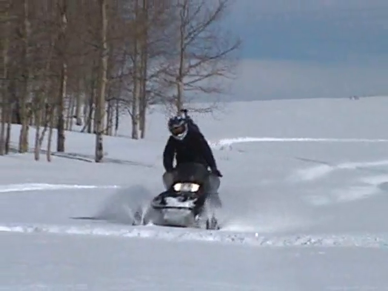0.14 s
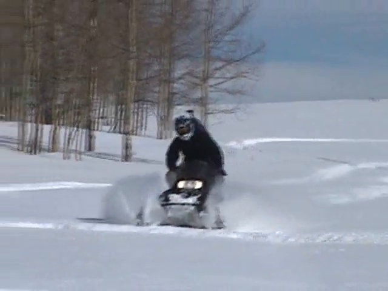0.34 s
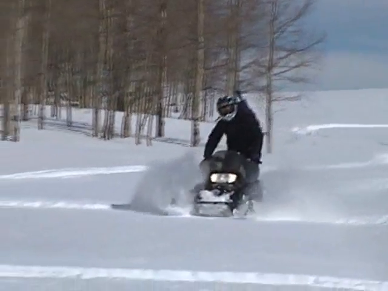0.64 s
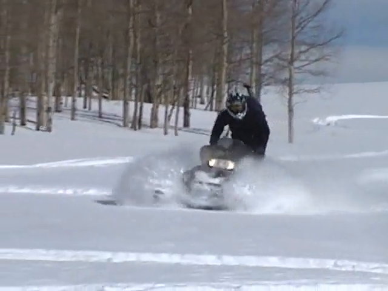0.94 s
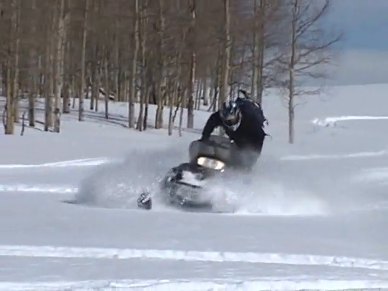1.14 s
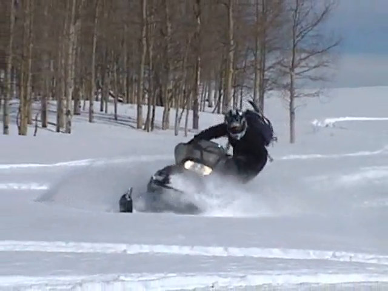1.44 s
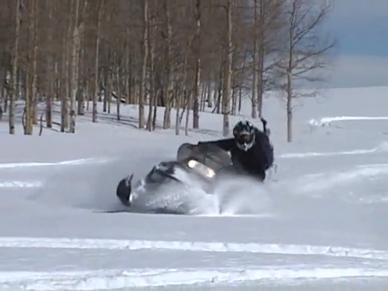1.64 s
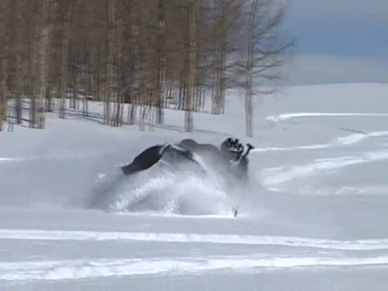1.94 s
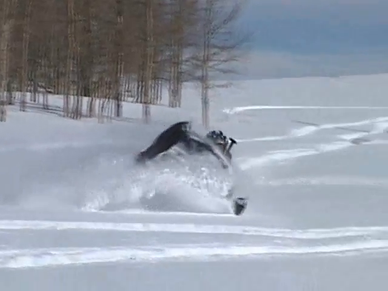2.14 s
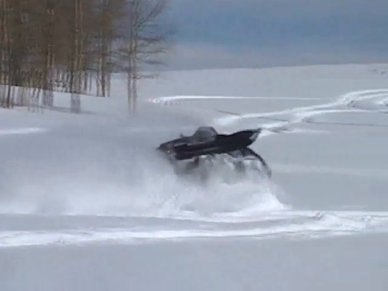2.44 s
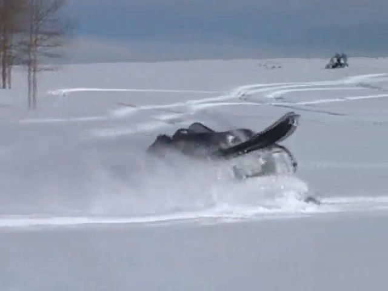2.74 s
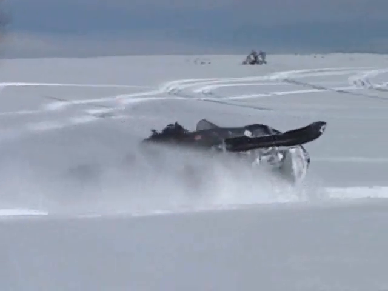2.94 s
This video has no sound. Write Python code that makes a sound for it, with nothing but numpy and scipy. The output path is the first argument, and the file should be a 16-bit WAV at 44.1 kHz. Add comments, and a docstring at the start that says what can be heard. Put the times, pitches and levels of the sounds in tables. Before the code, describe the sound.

A snowmobile approaches outdoors, its engine muffled and sagging under a light hiss of thrown snow. It revs up sharply and bursts into a loud, raspy buzz near the microphone, staying high as its tone turns duller.

```python
"""A two-stroke snowmobile labours through deep snow, then revs up and carves past on its side.
At first the exhaust is buried: one hears a muffled drone, clatter under the hood, a whining drive
and hissing powder. From about 1.3 s the revs climb, the buried pipe barks and the track howls briefly.
Near 1.8 s the sled tips, so the pipe clears the snow and rasps at the listener, one pulse per firing.
Then the pipe turns away, which changes its tone while the engine keeps running fast."""
import sys
import numpy as np
from scipy import signal
from scipy.fft import rfft, irfft
from scipy.io import wavfile

SR = 44100
rng = np.random.default_rng(int(sys.argv[2]) if len(sys.argv) > 2 else 0)


def unload_wav(signal):
    """Save mono or channel-first audio to the path in sys.argv[1] as 16-bit WAV at rate SR, clipped to [-1, 1]."""
    wavfile.write(
        sys.argv[1],
        SR,
        np.round(np.clip(np.atleast_2d(signal).T, -1, 1) * 32767).astype(np.int16),
    )


N = 136710
T, HZ = np.arange(N) / SR, np.fft.rfftfreq(N, 1 / SR)

# how fast the engine fires (time [s], rate [Hz])
FIRING_RATE = [(0, 200), (.1, 171), (.2, 166), (.33, 150), (.75, 153), (.89, 159), (1.1, 152), (1.28, 159),
               (1.4, 178.3), (1.6, 222), (1.75, 252), (1.82, 253), (1.9, 258), (2, 258), (2.1, 256.2),
               (2.57, 256), (2.77, 252.7), (2.85, 248.7), (3.1, 243.4)]
# how loud the open pipe is (time [s], level [dB])
EXHAUST_LEVEL = [(0, -62), (1.3, -50), (1.5, -35), (1.68, -30.5), (1.73, -28.5), (1.79, -23), (1.83, -13),
                 (1.9, -13.5), (1.98, -14), (2.12, -13), (2.3, -12.5), (2.55, -12), (2.8, -12), (2.88, -14),
                 (3.1, -14)]
# where it points (time [s], aim [0 skimming the snow, 1 at us, 2 just past, 3 sideways, 4 or more away])
PIPE_AIM = [(1.72, 2), (1.79, 0.35), (1.84, 0.66), (1.95, 0.5), (2.02, 1.47), (2.13, 2), (2.26, 3),
            (2.42, 3.5), (2.75, 3.5), (2.88, 6), (3.0, 4), (3.1, 4)]
# the pipe's own tone (frequency [Hz], level [dB])
PIPE_TONE = [(250, -20.5), (510, -16), (770, -18), (1000, -15), (1220, -1), (1550, -.5), (2050, -2.5),
             (2530, -1), (2820, -10), (3320, -1.5), (3650, -5.5), (4100, -4), (4400, -11.5), (4750, -10),
             (5300, -16), (5850, -10.5), (6300, -25.5), (7600, -20), (8300, -25.5), (9700, -25),
             (10300, -32), (11200, -31), (15000, -47.5)]
# how aims 0, 1, 2 and 4 change that tone (frequency [Hz], boost [dB])
AIM_SKIMMING = [(250, 0.5), (1200, 3.5), (1550, -2), (2300, -9), (3300, -4), (5800, 2.5), (7500, 6),
                (15000, 9.5)]
AIM_FACING = [(250, 0), (1000, -6), (1300, -16), (1550, -28.5), (2050, -34), (2350, -2), (3300, -4.5),
              (5800, 1), (7500, 12.5), (15000, 16.5)]
AIM_JUST_PAST = [(250, -0.5), (1000, 1.5), (1300, -2.5), (1800, -15), (2300, 5), (3300, 1.5), (4400, 1.5),
                 (5600, 9.5), (7500, 11.5), (9500, 8.5), (11500, -2), (15000, 9)]
AIM_AWAY = [(250, 6), (800, -0.5), (1230, 4), (1700, -2), (2000, 3.5), (2500, -6), (3300, -3),
            (3750, -13.5), (4250, 0.5), (5000, -6), (8000, -5), (15000, -2)]
# gas hiss compared with the pipe's tone (frequency [Hz], level [dB])
GAS_HISS = [(100, -30), (1200, -19), (3000, -12), (6000, -7.5), (9000, -5), (15000, 7)]
def exhaust(turns, jitter_s=5e-6, waver=0.34, shimmer=0.031, bounce_s=.00075, bounce=0.5):
    """Each firing rings the pipe with a sharp pulse and a puff of gas; the pipe's aim sets the tone."""
    step = 128  # samples between updates of the tone
    t = T[::step]
    changes = (read(AIM_SKIMMING), read(AIM_FACING), read(AIM_JUST_PAST), 0, read(AIM_AWAY))
    colours = [ringing(read(PIPE_TONE) + change) for change in changes]
    aim = np.clip(at(PIPE_AIM, t), 0, 4)
    shares = [np.maximum(1 - abs(aim - k), 0) for k in range(5)]  # fade from one aim to the next
    harmonics_hz = np.arange(1, 63)[:, None] * at(FIRING_RATE, t)
    gains = np.exp(sum(s * np.interp(harmonics_hz, HZ, c) for s, c in zip(shares, colours)))
    strength = np.sqrt((abs(gains) ** 2).sum(0) / 2)
    # a very short echo off the snow doubles each pulse and smears it in time
    echo = np.exp(-2j * np.pi * harmonics_hz * bounce_s)
    gains = gains / strength * (bounce + echo) / (1 + bounce * echo)
    firing = np.exp(2j * np.pi * (turns + jitter_s * at(FIRING_RATE) * wander(120)))
    tone, harmonic = np.zeros(N), np.ones(N, complex)
    for gain, hz in zip(gains, harmonics_hz):
        harmonic = harmonic * firing  # one harmonic higher
        drift = wander(12.5, len(t), step) + 1j * wander(2.3, len(t), step)
        flicker = np.exp(waver * hz / (hz + 4000) * drift)  # the treble flickers most
        tone += (np.interp(T, t, gain * flicker) * harmonic).real
    tone *= 1 + shimmer * wander(120.1)
    puffs = unit(0.31 + np.exp(-(turns % 1) / 0.39))  # steady flow plus a fading puff per firing
    gas = rfft(noise(1, puffs)) * amp(read(GAS_HISS)) * np.sqrt(SR / at(FIRING_RATE).max()) / 2
    hiss = sum(np.interp(T, t, s / strength) * irfft(gas * np.exp(c), N) for s, c in zip(shares, colours))
    return amp(at(EXHAUST_LEVEL)) * (hiss - tone)


# the bark as the throttle opens (time [s], level [dB])
BARK_LEVEL = [(1.25, -55), (1.38, -28), (1.5, -26), (1.59, -31.5), (1.65, -26.5), (1.76, -22), (1.85, -21),
              (1.93, -62)]
# where the buried pipe rings (frequency [Hz], width [Hz], level [dB])
BURIED_RINGS = [(1200, 127, -6), (1630, 110, -0.5), (2280, 123, 3), (3410, 298, -8)]
def bark(turns, rough=.52):
    """Ragged firings ring the pipe while it is still under the snow."""
    uneven = turns + .011 * wander(60)
    pulses = unit(sum(np.cos(2 * np.pi * k * uneven) for k in range(4, 24)))
    ragged = pulses * (1 + rough * wander(140)) + rough * noise(1)
    rings = sum(amp(db) / (1 + 2j * (HZ - hz) / width) for hz, width, db in BURIED_RINGS)
    bass_cut = (HZ / 800) ** 4 / (1 + (HZ / 800) ** 4)
    return amp(at(BARK_LEVEL)) * unit(irfft(rfft(ragged) * rings * bass_cut, N))


# the muffled firing note (time [s], level [dB])
DRONE_LEVEL = [(0.0, -44), (0.16, -39), (0.19, -43), (0.44, -56), (0.76, -51), (0.78, -40), (0.95, -52),
               (1.27, -39), (1.29, -35), (1.8, -34.5), (2.05, -52), (2.68, -39), (3.01, -36), (3.1, -36)]
# its overtones (multiple of the firing rate, level [dB])
DRONE_OVERTONES = [(2, -13.5), (3, -13), (4, -11.5), (5, -15.5), (6, -14.5)]
# how they swell as the engine works harder (time [s], level [dB])
LOAD_LEVEL = [(0, -50), (.4, -46), (.9, -40.5), (1.25, -35), (1.5, -33.5), (1.75, -26.5), (1.9, -31.5),
              (2.1, -56)]
def drone(turns, rough=0.12, overtone_rough=0.32, trim_db=-1, buried_until_s=1.85):
    """The firing note comes through the snow, gaining overtones under load."""
    buried = np.clip((buried_until_s - T) / 0.11 + .5, 0, 1)
    note = np.cos(2 * np.pi * turns) * (1 + rough * wander(40))
    low = buried * amp(at(DRONE_LEVEL) + trim_db) * note
    overtones = np.zeros(N)
    for k, db in DRONE_OVERTONES:
        clean = np.cos(2 * np.pi * (k * turns + rng.random()))
        overtones += amp(db) * (clean + overtone_rough * fuzzy(k * turns, width_hz=20))
    return np.sqrt(2) * (amp(at(LOAD_LEVEL)) * overtones - low)


# how loud the clatter is (time [s], level [dB])
CLATTER_LEVEL = [(0, -28), (.2, -33), (.45, -33.5), (.82, -31.5), (1.05, -32), (1.3, -31.5), (1.42, -24.5),
                 (1.52, -24), (1.58, -24), (1.72, -22), (1.84, -18.5), (1.94, -32.5), (2.3, -31),
                 (3.1, -31.5)]
# the hood's broad tone (frequency [Hz], level [dB])
HOOD_TONE = [(120, -38), (230, -21), (400, -18), (650, -12), (950, -9), (1300, -6.5), (1650, -1.5),
             (2200, -6), (2750, -7), (3350, -6.5), (3900, -9.5), (4450, -14.5), (5100, -15), (5700, -16.5),
             (7000, -18.5), (9900, -27), (15000, -39)]
# where it rings (frequency [Hz], width [Hz], level [dB])
HOOD_PEAKS = [(1110, 140, -12.5), (1652, 75, -13), (2280, 70, -16.5), (3310, 90, -10), (5730, 220, -14)]
def clatter(turns, throb=0.12, grain_db=0.5, wobble_db=0.89):
    """Grainy machine noise, throbbing with the firings, rings the hood."""
    body = unit(amp(read(HOOD_TONE)))
    ring_power = sum((amp(db) * unit(1 / (1 + ((HZ - hz) / width) ** 2))) ** 2
                     for hz, width, db in HOOD_PEAKS)
    knocks = (1 + throb * np.cos(2 * np.pi * turns)) * amp(grain_db * wander(350))
    loudness = amp(at(CLATTER_LEVEL) + wobble_db * wander(6.7))
    return loudness * noise(np.sqrt(body ** 2 + ring_power), knocks)


# how loud the drive is (time [s], level [dB])
WHINE_LEVEL = [(0, -48), (.4, -58), (.58, -42), (.72, -42.5), (.84, -40), (.95, -39), (1.2, -38.5),
               (1.45, -41), (1.65, -40), (1.85, -47), (1.95, -64)]
# the spinning track's notes (multiple of the firing rate, level [dB])
TRACK_NOTES = [(.4, -48), (.8, -41), (2.48, -40), (4.55, -27)]
def drive(turns, whine_multiple=6.95, rough=0.81, howl_at_s=1.78, howl_fade_s=.13):
    """The drive whines with the revs; the track howls briefly as it spins up."""
    cycles = whine_multiple * turns
    whine = unit(np.cos(2 * np.pi * cycles) + rough * fuzzy(cycles, width_hz=19))
    howl = sum(amp(db) * fuzzy(k * turns, width_hz=11.6) for k, db in TRACK_NOTES)
    swell = np.exp(-((T - howl_at_s) / howl_fade_s) ** 2)
    return amp(at(WHINE_LEVEL)) * whine + swell * howl


# how loud the thrown snow and the rumble are (time [s], level [dB])
SPRAY_LEVEL = [(0, -54), (.25, -45.5), (.4, -40.5), (.7, -42), (.9, -38), (1.2, -49), (1.35, -39),
               (1.52, -28.5), (1.75, -28), (1.85, -26), (2.05, -40), (2.2, -32.5), (3.1, -35)]
RUMBLE_LEVEL = [(0, -53), (.3, -52), (.4, -45), (.55, -47.5), (.69, -52), (.77, -46.5), (1.1, -49),
                (1.3, -47.5), (1.8, -45.5), (2.05, -63), (2.6, -51), (3.1, -61)]
# the tone of each (frequency [Hz], level [dB])
SPRAY_TONE = [(1000, -41), (4000, 2), (7000, -1.5), (10000, -3), (15000, -16)]
RUMBLE_TONE = [(20, -13), (45, -9), (70, 1.5), (110, -2), (250, -4.5), (600, -14.5), (3000, -74)]
def snow(grain_db=3, spread=0.17):
    """Powder hisses off the track over a low churning rumble."""
    spray = noise(amp(read(SPRAY_TONE)), amp(grain_db * wander(900)))
    lows = amp(read(RUMBLE_TONE))
    wide = unit(irfft(rfft(rng.standard_normal((2, N))) * lows, N))  # separate noise for each ear
    rumble = unit(noise(lows) + spread * wide)
    return amp(at(SPRAY_LEVEL)) * spray + amp(at(RUMBLE_LEVEL)) * rumble


# how loud the engine's limp is (time [s], level [dB])
LOPE_LEVEL = [(1.9, -66), (2.4, -62), (2.55, -50), (3.1, -56)]
def lope(turns):
    """Every other firing is a little stronger, which adds a faint note an octave down."""
    return amp(at(LOPE_LEVEL)) * fuzzy(turns / 2, width_hz=4.7)


def amp(db):
    """Turns decibels into a gain."""
    return 10 ** (np.asarray(db) / 20)


def unit(x):
    """Scales a signal to an average strength (rms) of 1."""
    return x / np.sqrt(np.mean(abs(x) ** 2) + 1e-20)


def at(points, t=T):
    """Reads a table over time."""
    return np.interp(t, *np.transpose(points))


def read(points):
    """Reads a table over frequency, on a log scale."""
    hz, value = np.transpose(points)
    return np.interp(np.log(HZ + 1), np.log(hz + 1), value)


def wander(hz, size=N, step=1):
    """A smooth random wiggle, mostly slower than hz."""
    f = np.fft.rfftfreq(size, step / SR)
    return unit(irfft(rfft(rng.standard_normal(size)) * np.exp(-(f / hz) ** 2), size))


def fuzzy(turns, width_hz):
    """A tone whose strength and phase drift."""
    angle = 2 * np.pi * turns
    return unit(wander(width_hz) * np.cos(angle) + wander(width_hz) * np.sin(angle))


def ringing(db):
    """The filter (as a complex log gain) of a body that rings with this spectrum."""
    log = np.log(amp(db))
    return np.conj(signal.hilbert(np.r_[log, log[-2:0:-1]]))[:len(log)]


# how alike left and right are (frequency [Hz], likeness [0 to 1])
LIKENESS = [(60, 0.76), (180, 0.78), (540, 1), (1630, 0.95), (4910, 0.95), (14800, 0.82)]
def noise(gain, envelope=1):
    """Filtered noise, partly alike in both ears."""
    left, other = rfft(rng.standard_normal((2, N)) * envelope)
    same = np.clip(read(LIKENESS), 0, 1)
    right = same * left + np.sqrt(1 - same ** 2) * other
    return unit(irfft(np.array([left, right]) * gain, N))


def scene():
    """Every part of the machine follows one engine speed."""
    rate_hz = at(FIRING_RATE) * (1 + 0.00088 * wander(14.2))
    turns = np.cumsum(rate_hz) / SR  # counts the firings so far
    engine = lope(turns) + exhaust(turns) + bark(turns) + drone(turns)
    return engine + clatter(turns) + drive(turns) + snow()


# which side is louder (frequency [Hz], left minus right [dB])
BALANCE = [(60, 0), (130, -4.5), (290, -4.5), (640, -4.5), (1390, -2), (3060, -2), (6720, 0.0), (14800, 1)]
# which side comes first (frequency [Hz], left's lead [radians])
LEFT_LEAD = [(0, 1), (5080, 0.26), (6370, -0.41), (7410, 0.99), (8440, 0.55), (14900, 0.0)]
def record(dry, ceiling=.88, top_hz=15300):
    """Two close microphones hear the sled; loud peaks are rounded off and the highest treble is cut."""
    sides = np.array([[.5], [-.5]])
    heard = irfft(rfft(dry) * amp(sides * read(BALANCE)) * np.exp(1j * sides * read(LEFT_LEAD)), N)
    rounded = heard / (1 + (heard / ceiling) ** 8) ** (1 / 8)
    treble_cut = signal.firwin(511, top_hz, window=("kaiser", 9), fs=SR)
    return signal.oaconvolve(rounded, treble_cut[None], "same")


dry = scene()
out = record(dry)
unload_wav(out)
```